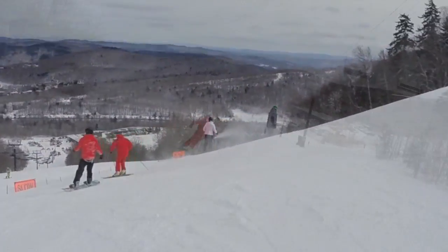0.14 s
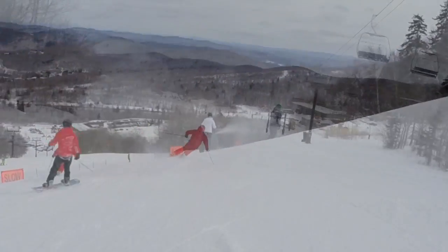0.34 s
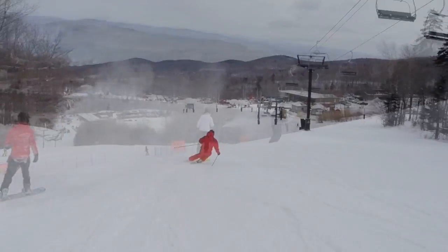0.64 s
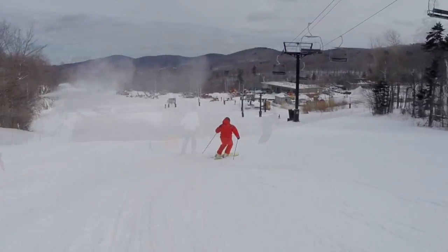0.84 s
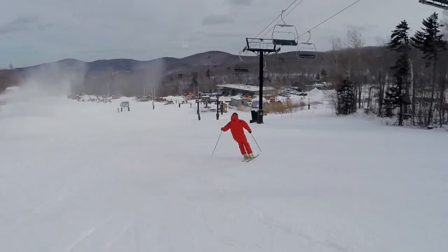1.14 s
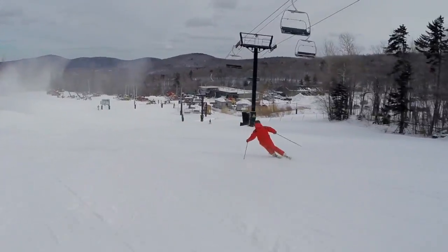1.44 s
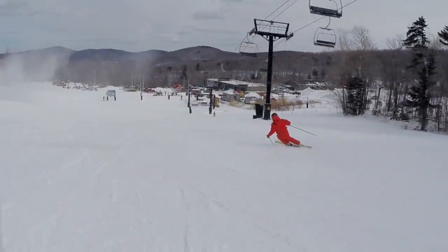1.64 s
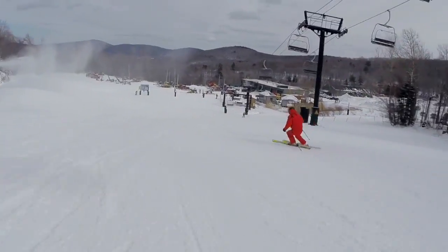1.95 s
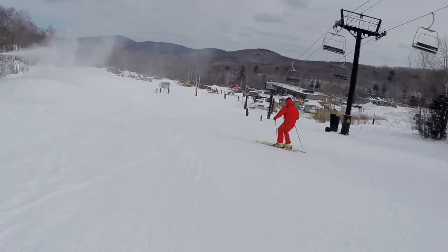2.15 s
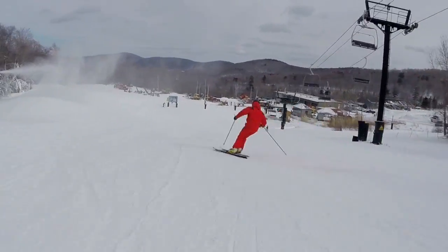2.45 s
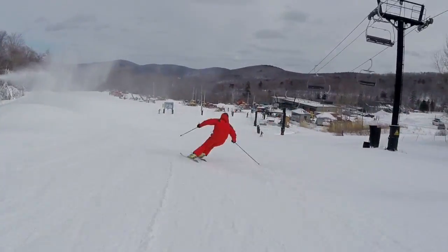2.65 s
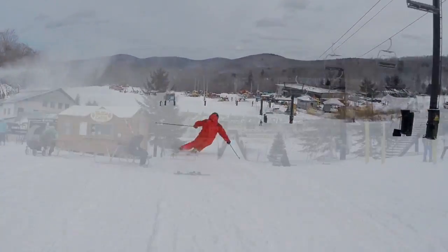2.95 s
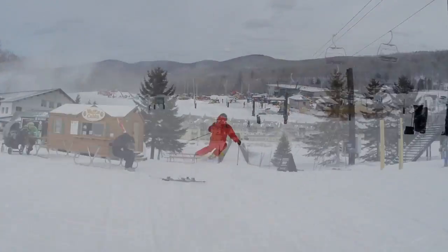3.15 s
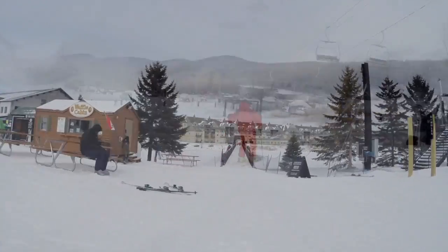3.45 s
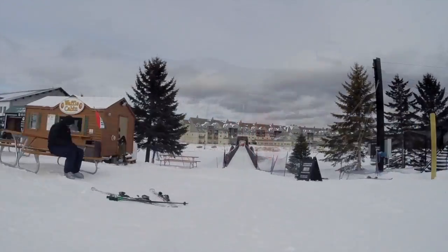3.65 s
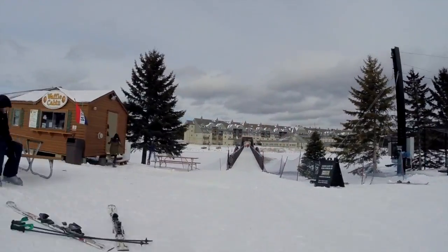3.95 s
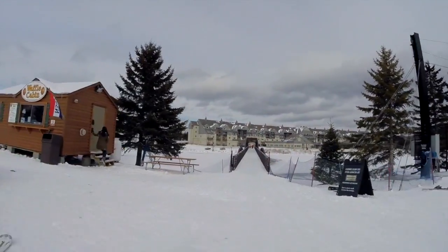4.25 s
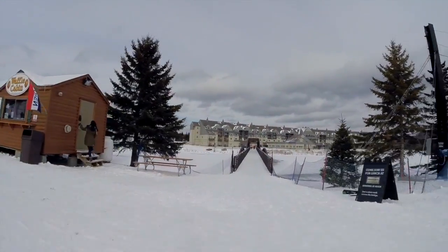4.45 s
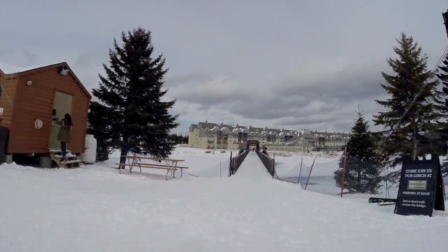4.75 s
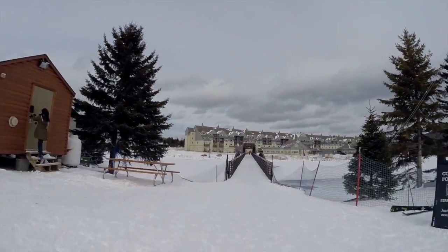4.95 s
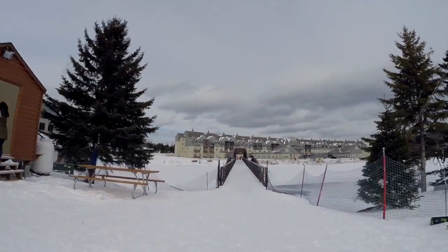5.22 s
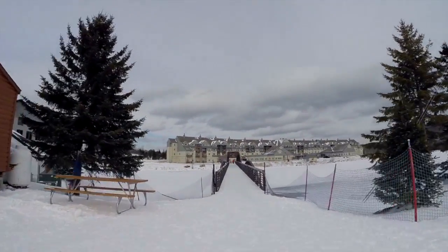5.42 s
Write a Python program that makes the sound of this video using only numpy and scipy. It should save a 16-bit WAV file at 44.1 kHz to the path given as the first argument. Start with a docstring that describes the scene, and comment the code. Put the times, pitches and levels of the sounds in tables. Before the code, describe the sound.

Close, body-mounted camera microphone on an open snowy slope: skis rasp and hiss through fast turns, with powder fizz, ticking ice pellets and low wind buffeting. Around three seconds the run crossfades into a slow flat glide, quieter and grainy, with small wind thumps, crust crunches, one knock at four seconds, and a cluster of plastic knocks near the end.

```python
"""First a harsh scrape of skis in fast turns on packed snow; it fades over into a slow, flat glide.
Breaking snow crystals, made as random tiny clicks, ring the resonances of the skis and camera housing.
Crust crunches in short bursts of clicks; in the fast run powder fizzes and ice pellets tick as noise.
The camera mount knocks as dying sine tones, once in the glide and several times near the end.
Behind it all, wind is filtered noise that thumps and rushes on the microphone."""
import sys
import numpy as np
from scipy import signal
from scipy.fft import rfft, irfft, next_fast_len
from scipy.io import wavfile
from scipy.ndimage import uniform_filter1d, map_coordinates

SR = 44100
rng = np.random.default_rng(int(sys.argv[2]) if len(sys.argv) > 2 else 0)


def waveform_to_disk(signal):
    """Save audio, clipped to [-1, 1], as 16-bit WAV at the path in sys.argv[1]."""
    frames = np.transpose(np.atleast_2d(signal))
    scaled = np.clip(frames, -1, 1) * 32767
    samples = np.round(scaled).astype(np.int16)
    wavfile.write(sys.argv[1], SR, samples)


N = 246078

# Resonances of skis and housing on a clean edge: (frequency [Hz], width [Hz], level [dB])
CARVE_MODES = [(1060, 43, -11.5), (1650, 980, -14.5), (1970, 420, 2), (2312, 760, 0.5), (2622, 82, 0.5),
               (2952, 250, -2.5), (3320, 360, -9), (3646, 440, -5), (4680, 1200, -12.5), (5000, 460, -18),
               (5460, 480, -19), (6260, 890, -8.5), (6650, 530, -15.5), (8170, 2270, -25.5)]
# The same with the edge skidding: (frequency [Hz], width [Hz], level [dB])
SKID_MODES = [(1320, 400, -20.5), (1593, 130, -6), (1952, 287, 3.5), (2370, 550, -8.5), (2660, 320, -12),
              (2890, 150, -10.5), (3210, 150, -10), (3680, 310, -6.5), (4300, 680, -9), (4700, 230, -7),
              (5500, 390, -9.5), (6250, 330, -11), (6640, 1130, -11), (8100, 2400, -26)]
# Harder friction is brighter: hiss against ring [dB] at the ordinary level, and dB gained per dB above it
ORDINARY_DB = -36
TURN_HISS_DB, TURN_BRIGHTENS = -2.5, 0.14
SKID_HISS_DB = -2  # a skidding edge hisses less against its ring than a carving one


def turns(ring_db, skid):
    """The edges judder over ridged snow, blending clean carving with sideways skidding."""
    hiss_db = ring_db + TURN_HISS_DB + TURN_BRIGHTENS * (ring_db - ORDINARY_DB)
    judder = amp(1.22 * wobble(60) + 1.03 * wobble(260))
    carving = friction(CARVE_MODES, 7000, 3.6, judder, ring_db, hiss_db)
    skidding = friction(SKID_MODES, 5000, 6.9, judder, ring_db, hiss_db + SKID_HISS_DB)
    return np.sqrt(1 - skid) * carving + np.sqrt(skid) * skidding + crunches(SKID_MODES)


# Each turn loads the edge, holds it and lets go:
# (full load time [s], release time [s], level [dB], share that skids sideways [0-1])
TURNS = [(0.082, 0.409, -35.5, 1), (1.432, 1.83, -33, 0.1), (2.524, 2.609, -31.5, 1)]
LOAD_DB_PER_S, RELEASE_DB_PER_S = 37.5, 117  # how fast a turn builds and dies away
# Skis running between turns: level at top speed [dB], and its growth for a tenfold speed [dB]
RUNNING_DB, RUNNING_GROWTH_DB = -37.5, 24


def edging():
    """Friction level in dB and skidding share: each turn adds power to the plain running of the skis."""
    t = np.arange(N) / SR
    power = amp(at_speed(RUNNING_DB, RUNNING_GROWTH_DB)) ** 2
    skidding = 0
    for full, release, db, skid in TURNS:
        loading_db = LOAD_DB_PER_S * np.maximum(full - t, 0)
        releasing_db = RELEASE_DB_PER_S * np.maximum(t - release, 0)
        turn = amp(db - loading_db - releasing_db) ** 2
        power = power + turn
        skidding = skidding + skid * turn
    return 10 * np.log10(power) + ridges(), np.clip(skidding / power, 0, 1)


# The slow glide before uneven snow: (time [s], friction level [dB], top-treble sizzle level [dB])
GLIDE = [(3.4, -43.5, -67), (3.72, -37.5, -56), (4.12, -39, -59), (4.38, -40.5, -62), (4.62, -38.5, -60.5),
         (5.0, -34.5, -58), (5.24, -33, -56), (5.3, -39.5, -71), (5.58, -40, -57.5)]
# Skis and housing running flat and slowly: (frequency [Hz], width [Hz], level [dB])
GLIDE_MODES = [(1210, 270, -23), (1630, 320, -15), (1960, 420, 0), (2380, 320, -5), (2620, 150, -8),
               (3160, 340, -19), (3510, 260, -8), (4400, 490, -11), (4930, 980, -16), (5830, 920, -15),
               (6370, 720, -10), (7670, 750, -16), (8440, 510, -20), (9250, 900, -30), (10510, 1040, -27)]
# Resonances of the sizzle: (frequency [Hz], width [Hz], level [dB])
SIZZLE_MODES = [(9100, 2500, 1), (10400, 1200, -5), (12100, 1700, 4.5), (14500, 980, -6)]
GLIDE_HISS_DB, GLIDE_BRIGHTENS = -4, 0.49  # as for the turns
CRUNCH_SIZZLE_DB = -28  # how much soft snow sizzles with a crunch


def glide():
    """Flat skis at low speed break fewer crystals, with a soft sizzle on top."""
    friction_db, sizzle_db = curves(GLIDE)
    uneven_db = ridges()
    ring_db = friction_db + uneven_db
    hiss_db = ring_db + GLIDE_HISS_DB + GLIDE_BRIGHTENS * (ring_db - ORDINARY_DB)
    judder = amp(0.99 * wobble(80) + 1.14 * wobble(280))
    soft_grains = judder * crystals(4100, spread_db=5.0, smooth_db=-2)
    sizzle_level = amp(sizzle_db + 0.76 * uneven_db + 0.65 * wobble(25))
    sizzle = sizzle_level * unit(coloured(soft_grains, body(SIZZLE_MODES)))
    crust = crunches(GLIDE_MODES) + amp(CRUNCH_SIZZLE_DB) * crunches(SIZZLE_MODES)
    scraping = friction(GLIDE_MODES, 1900, 4.1, judder, ring_db, hiss_db)
    return scraping + patchy(sizzle, depth_db=2.5) + crust


def friction(modes, grain_rate, spread_db, judder, ring_db, hiss_db):
    """Breaking crystals ring a set of resonances; the low ones and the hiss have their own levels."""
    def low(hz):  # a steep split at 3100 Hz
        return 1 / np.sqrt(1 + (hz / 3100) ** 24)

    def high(hz):
        return np.sqrt(1 - low(hz) ** 2)

    ring_grains = judder * crystals(grain_rate, spread_db, smooth_db=-2)
    hiss_grains = judder * crystals(grain_rate, spread_db, smooth_db=-2.5)
    ring = coloured(ring_grains, lambda hz: body(modes)(hz) * low(hz))
    hiss = coloured(hiss_grains, lambda hz: body(modes)(hz) * high(hz))
    ring_level = amp(ring_db + 0.88 * wobble(45))
    hiss_level = amp(hiss_db + 0.38 * wobble(45))
    return patchy(ring_level * unit(ring) + hiss_level * unit(hiss), depth_db=1.25)


def crystals(rate, spread_db, smooth_db):
    """Tiny fractures of uneven size, rate a second, over a bed of smooth friction."""
    size = amp(spread_db * np.minimum(rng.standard_normal(N), 2))
    grains = (rng.random(N) < rate / SR) * rng.choice([-1, 1], N) * size
    return unit(unit(grains) + amp(smooth_db) * rng.standard_normal(N))


# Ridges press on the skis, hollows let them go light:
# (time [s], half width to 1/e [s], change of friction [dB])
RIDGES = [(.23, 0.012, 4), (.29, 0.016, -3), (.61, 0.049, 4), (.8, 0.023, -6), (.96, 0.017, 0.5),
          (1.03, 0.021, -4), (1.16, 0.013, 2.5), (1.67, 0.14, -2), (1.8, 0.02, 2), (2.2, 0.027, -4),
          (2.36, 0.037, 0.5), (3.24, 0.077, 2), (3.88, .02, -2.5), (4.17, .025, -3), (4.24, 0.04, 4),
          (4.6, 0.11, 3.5), (4.89, 0.01, 3)]


def ridges():
    """Change of friction in dB over the ridges and hollows of the snow."""
    return sum(db * swell(s, width) for s, width, db in RIDGES)


# The skis break through crust: (time [s], level before the quick rise and the fade-over [dB])
CRUNCHES = [(0.161, -27), (0.202, -26.5), (0.311, -27), (0.343, -28), (1.153, -31), (1.776, -28.5),
            (2.5184, -26), (2.591, -27), (3.922, -32), (3.948, -31), (4.2703, -36), (4.378, -33),
            (4.415, -32.5), (4.449, -30.5), (4.484, -32), (4.82, -33), (4.852, -26.5), (4.9836, -26.5),
            (5.1116, -27), (5.141, -21)]
CRUNCH_S, CRUNCH_ATTACK_S = 0.017, .001  # time to fall 20 dB, and time constant of the rise
CRUNCH_SMOOTH_DB = 2  # smooth friction against the fractures


def crunches(modes):
    """Crust gives way in short bursts of fractures that ring the given resonances."""
    force = np.zeros(N)
    t = np.arange(SR // 6) / SR
    for s, db in CRUNCHES:
        add(force, s, amp(db - 20 * (t / CRUNCH_S) ** 2) * (1 - np.exp(-t / CRUNCH_ATTACK_S)))
    fractures = crystals(5000, spread_db=8.5, smooth_db=CRUNCH_SMOOTH_DB)
    return force * unit(coloured(fractures, body(modes)))


# Puffs of powder reach the housing: (time [s], half width to 1/e [s], level before colouring [dB])
PUFFS = [(.01, 0.017, -46), (.15, .03, -45), (.35, .02, -48), (.83, 0.022, -53), (.965, 0.033, -47.5),
         (1.12, 0.13, -53.5), (1.495, 0.023, -39), (1.565, 0.058, -40.5), (1.76, 0.046, -43.5),
         (1.83, 0.016, -44), (2.0, 0.044, -53)]
# Ice pellets hit the housing: (time [s], noise level before colouring [dB])
PELLETS = [(0.7248, -43), (0.756, -33), (0.9575, -29), (0.966, -25), (0.9754, -36), (1.0869, -32),
           (1.2965, -36), (1.4885, -38), (1.5478, -22), (1.5588, -19), (1.5744, -20.5), (1.6447, -27),
           (2.2777, -40), (2.9836, -37)]
# Colour of powder and pellets on the housing: (frequency [Hz], gain [dB])
POWDER = [(1500, -32), (3500, 10), (6500, 4), (9000, -1), (10500, -2), (12600, -7), (13500, -3),
          (14500, -23), (16000, 2)]
FIZZ_DB, FIZZ_FOLLOWS = -57, 0.72  # base powder level before colouring, and its dB per dB of friction
PELLET_T60_S = .005  # time for a tick to fall 60 dB


def spray(friction_db):
    """During the fast run, fine powder fizzes on the housing, thicker in puffs, and larger pellets tick."""
    base = amp(FIZZ_DB + FIZZ_FOLLOWS * (friction_db - ORDINARY_DB))
    puffs = sum(amp(db) * swell(s, width) for s, width, db in PUFFS)
    flicker = amp(3.6 * wobble(90))
    fizz = np.hypot(base, puffs) * flicker * crystals(1500, spread_db=8, smooth_db=-1)
    t = np.arange(SR // 100) / SR
    for s, db in PELLETS:
        add(fizz, s, amp(db - 60 * t / PELLET_T60_S) * rng.standard_normal(len(t)))
    return patchy(coloured(fizz, slope(POWDER)), depth_db=1.5)


# The mount shifts; levels before the quick rise:
# (time [s], knock level [dB], crack level [dB], click level [dB], thud level [dB])
KNOCKS = [(4.109, -35.5, -33, -35, -30), (5.448, -29.5, -28, -24.5, -28), (5.472, -31.5, -25, -33.5, -34),
          (5.480, -31, -34, -26, -26), (5.528, -33, -39, -7, -30)]
# Ringing tones of the mount, before scatter: (frequency [Hz], level [dB], time to fall 60 dB [s])
MOUNT = [(135, -5, .1), (296, -8.5, 0.097), (425, -14, 0.068), (494, -9.5, 0.078), (1023, -4.5, 0.055),
         (1290, -3, 0.033), (1530, -5, 0.015), (2260, 5, 0.022), (2860, 2.5, 0.024), (3280, 1, 0.034)]
# The dry crack of the plastic mount: (frequency [Hz], relative gain [dB])
CRACK = [(150, -7), (300, -5), (520, -24), (720, -14), (1200, 1.5), (2000, 1), (3100, -12.5), (4200, -9),
         (7000, -14), (12000, -32)]
MOUNT_SCATTER_DB, MOUNT_DETUNE = 1.7, .015  # random spread of tone level, and of pitch as a share


def mount():
    """Each knock cracks and rings the plastic mount, clicks its joint and sways the camera."""
    out = np.zeros(N)
    t = np.arange(SR // 4) / SR
    grits = np.array_split(noise(CRACK), len(KNOCKS))
    for (s, knock_db, crack_db, click_db, thud_db), grit in zip(KNOCKS, grits):
        ring = np.zeros(len(t))
        for hz, db, t60 in MOUNT:
            level = amp(db + rng.normal(0, MOUNT_SCATTER_DB) - 60 * t / t60)
            cycles = hz * rng.normal(1, MOUNT_DETUNE) * t + rng.random()
            ring += level * np.sin(2 * np.pi * cycles)
        crack = amp(-60 * t / 0.033) * grit[:len(t)]
        click = amp(-60 * t / 0.0069) * np.sin(2 * np.pi * 2500 * t)
        sway = np.sin(2 * np.pi * 44 * rng.normal(1, 0.051) * t)
        thud = amp(-60 * t / 0.3) * (1 - np.exp(-t / 0.007)) * sway
        knock = amp(knock_db) * ring + amp(crack_db) * crack
        knock += amp(click_db) * click + amp(thud_db) * thud
        add(out, s, knock * (1 - np.exp(-t / 0.0011)))
    return out


# Single gusts: (time [s], half width to 1/e [s], extra buffeting [dB], extra rush [dB])
WIND_GUSTS = [(.15, 0.2, 2.5, -6), (.78, 0.044, 3, 2), (1.14, 0.034, 6.5, 0), (2.51, .05, 4, 1.5),
              (3.79, 0.071, 9, 16), (3.94, .06, 10, 2.5), (4.53, 0.063, 11, 5), (4.72, 0.055, 7, 7),
              (4.9, 0.023, 9, 0), (5.27, 0.13, 4, 0)]
# Large eddies at speed: (frequency [Hz], relative gain [dB])
FAST_BUFFET = [(10, -37), (22, 3), (36, 3), (50, -6), (65, -1.5), (82, 0.5), (100, -17), (130, -13),
               (300, -77)]
# Large eddies when slow: (frequency [Hz], relative gain [dB])
SLOW_BUFFET = [(10, -29), (22, -11), (36, -1), (50, 0.5), (58, -13), (72, -35), (200, -58)]
# Air rushing past the microphone: (frequency [Hz], relative gain [dB])
RUSH = [(60, -9), (100, -5.5), (140, -5.5), (172, -15.5), (218, -17), (320, -18), (400, -21.5), (468, -20),
        (624, -27.5), (1000, -27.5), (2000, -23), (8000, -59)]
# The quiet of the open slope: (frequency [Hz], relative gain [dB])
OPEN_AIR = [(30, -10), (75, -0.5), (130, 5), (200, 5), (320, 0.5), (470, -4), (620, -2.5), (1000, -19.5),
            (2500, -15), (15000, -23)]
# Before gusts: level at top speed, growth for a tenfold speed, level in the slow glide
BUFFET_DB, BUFFET_GROWTH_DB, SLOW_BUFFET_DB = -38, 43.5, -55.5
RUSH_DB, RUSH_GROWTH_DB, SLOW_RUSH_DB = -42.5, 44.5, -67.5


def wind(fast, slow):
    """Eddies thump on the microphone and air rushes past, both louder at speed, over quiet open air."""
    gust_db = sum(db * swell(s, width) for s, width, db, _ in WIND_GUSTS)
    gust_rush_db = sum(db * swell(s, width) for s, width, _, db in WIND_GUSTS)
    fast_eddies = fast * amp(at_speed(BUFFET_DB, BUFFET_GROWTH_DB)) * noise(FAST_BUFFET)
    slow_eddies = slow * amp(SLOW_BUFFET_DB) * noise(SLOW_BUFFET)
    buffet = amp(gust_db + 1.6 * wobble(10)) * (fast_eddies + slow_eddies)
    # the cube makes the fast rush fade sooner than the skis
    flow = fast ** 3 * amp(at_speed(RUSH_DB, RUSH_GROWTH_DB)) + slow * amp(SLOW_RUSH_DB)
    flutter_db = 1.8 * wobble(22.13) + 1.45 * wobble(80)
    rush = flow * amp(gust_rush_db + flutter_db) * noise(RUSH)
    return buffet + rush + amp(-64.5) * noise(OPEN_AIR)


# The fast run: (time [s], speed [share of top speed])
SPEED = [(0, 0.97), (.5, 0.62), (1.0, 0.81), (1.52, 1.0), (2.1, 0.97), (2.42, .94), (2.9, 0.74),
         (3.25, 0.78)]


def at_speed(top_db, growth_db):
    """A level in dB that grows with a power of the skier's speed."""
    return top_db + growth_db * np.log10(np.maximum(curves(SPEED)[0], 1e-3))


def patchy(x, depth_db):
    """The colour drifts at random, in smooth patches over time and frequency."""
    z = signal.stft(x, nperseg=512)[2]
    field = uniform_filter1d(rng.standard_normal(z.shape), size=5, axis=0)  # smooth over frequency
    field = uniform_filter1d(field, size=14, axis=1)  # smooth over time
    return signal.istft(z * amp(depth_db * unit(field)), nperseg=512)[1][:N]


def noise(points):
    """Noise of rms 1 with the given spectrum."""
    return unit(coloured(rng.standard_normal(N), slope(points)))


def coloured(x, gain):
    """Causal filter with the given gain, so that clicks ring after they strike."""
    half = next_fast_len(N // 2 + SR // 8)
    hz = np.fft.rfftfreq(2 * half, 1 / SR)
    cepstrum = irfft(np.log(np.maximum(gain(hz), 1e-6)))
    # fold the cepstrum forward in time: minimum phase
    cepstrum[1:half] *= 2
    cepstrum[half + 1:] = 0
    return irfft(rfft(x, 2 * half) * np.exp(rfft(cepstrum)))[:N]


def body(modes):
    """Gain against frequency of a set of steep resonances."""
    def gain(hz):
        return np.sqrt(sum((amp(db) / (1 + (2 * (hz - f) / w) ** 2)) ** 2 for f, w, db in modes))
    return gain


def slope(points):
    """Gain against frequency from (Hz, dB) points on a log axis."""
    f, db = np.transpose(points)
    return lambda hz: amp(np.interp(np.log(hz + 1), np.log(f), db))


def swell(s, half_width):
    """A bell-shaped rise and fall of height 1 around time s."""
    return np.exp(-((np.arange(N) / SR - s) / half_width) ** 2)


def wobble(rate):
    """A smooth random curve, rate knots a second."""
    knots = rng.standard_normal(int(N * rate / SR) + 4)
    return map_coordinates(knots, [np.arange(N) * rate / SR])


def curves(rows):
    """One value per sample for each column after the time."""
    s, *cols = np.transpose(rows)
    return [np.interp(np.arange(N) / SR, s, c) for c in cols]


def add(track, s, sound):
    """Mix a sound into a track at time s."""
    part = track[max(round(s * SR), 0):][:len(sound)]
    part += sound[:len(part)]


def amp(db):
    """Turn decibels into an amplitude factor."""
    return 10 ** (np.asarray(db) / 20)


def unit(x):
    """Scale to rms 1."""
    return x / np.sqrt(np.mean(x ** 2) + 1e-20)


# The fast run fades over into the glide: start and length
FADE_START_S, FADE_LENGTH_S = 3.1, 0.46


def scene():
    """The fast run fades over into the slow glide at equal power, with wind and mount throughout."""
    blend = np.clip((np.arange(N) / SR - FADE_START_S) / FADE_LENGTH_S, 0, 1)
    fast, slow = np.sqrt(1 - blend), np.sqrt(blend)
    friction_db, skid = edging()
    fast_run = fast * (turns(friction_db, skid) + spray(friction_db))
    slow_glide = slow * glide()
    return (fast_run + slow_glide + wind(fast, slow) + mount())[None]


TOP_HZ = 15450  # the camera's band limit


def record(dry):
    """The camera keeps nothing above its band limit."""
    size = next_fast_len(N + SR // 4)
    kept = np.fft.rfftfreq(size, 1 / SR) < TOP_HZ
    return irfft(rfft(dry, size) * kept, size)[:, :N]


dry = scene()
out = record(dry)
waveform_to_disk(out)
```